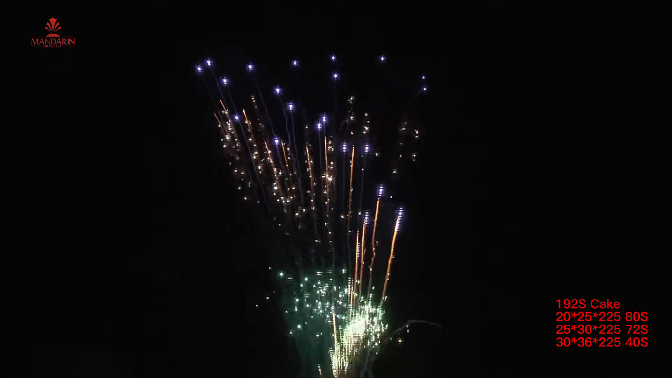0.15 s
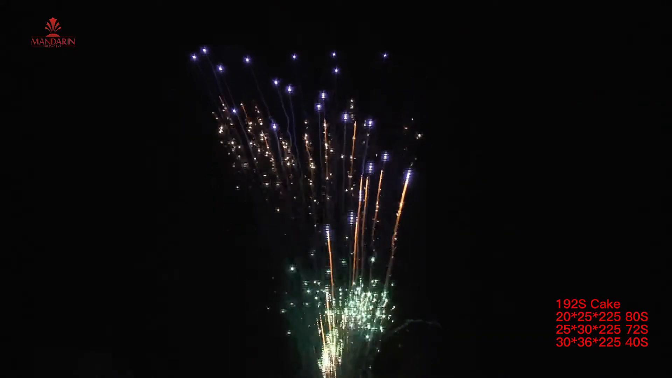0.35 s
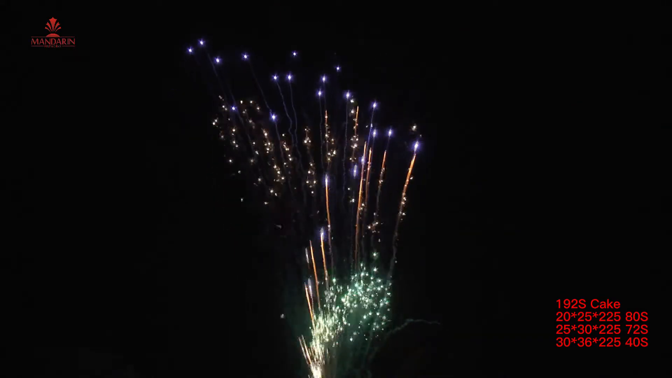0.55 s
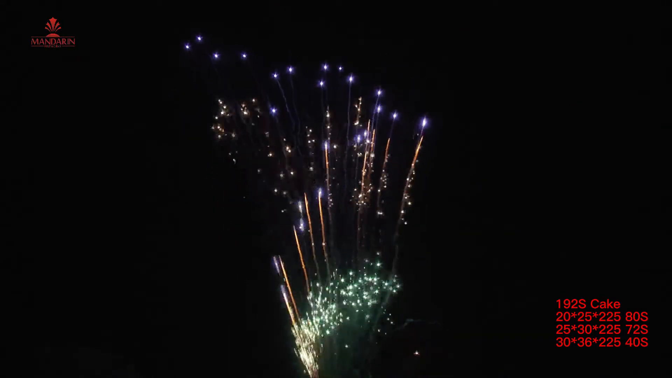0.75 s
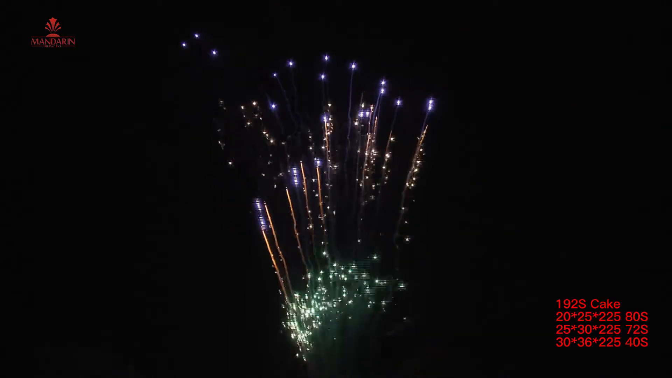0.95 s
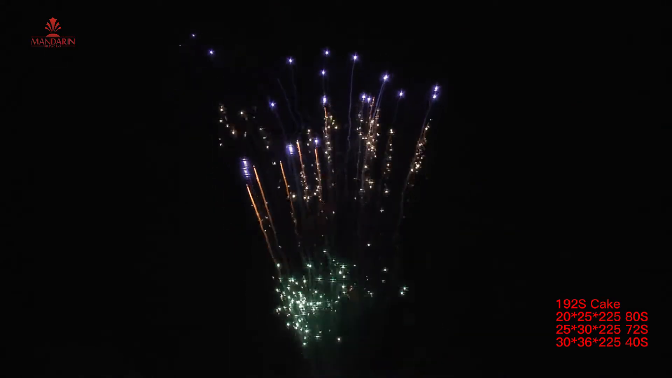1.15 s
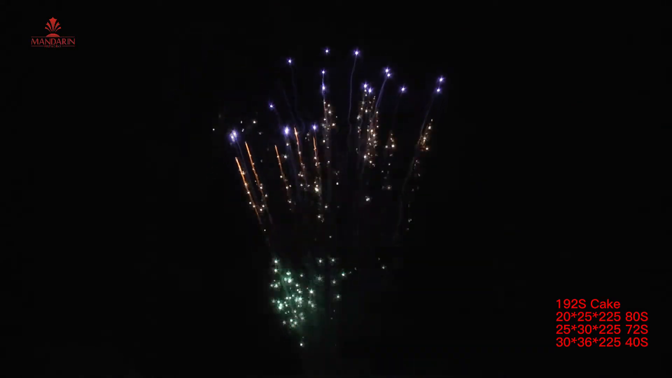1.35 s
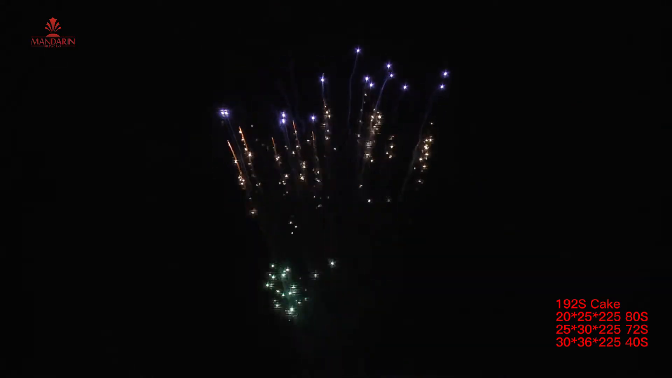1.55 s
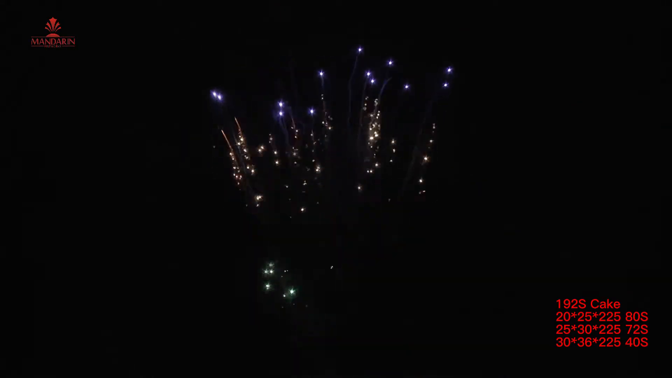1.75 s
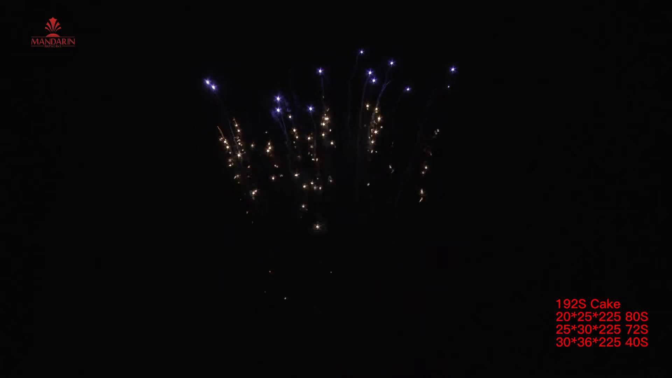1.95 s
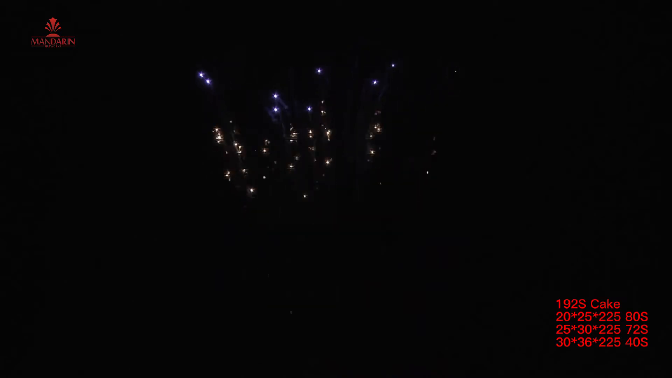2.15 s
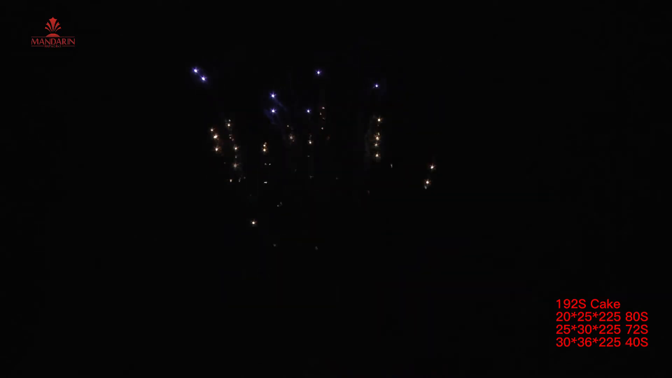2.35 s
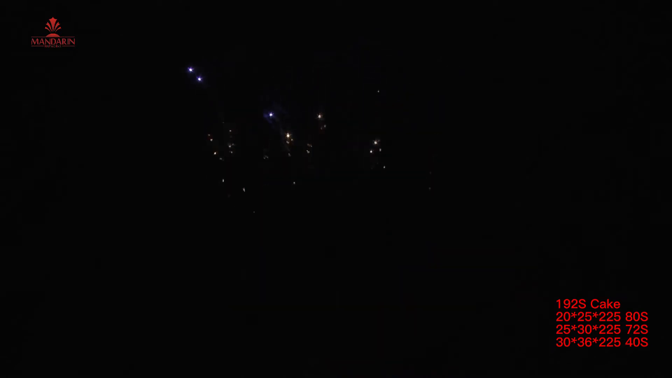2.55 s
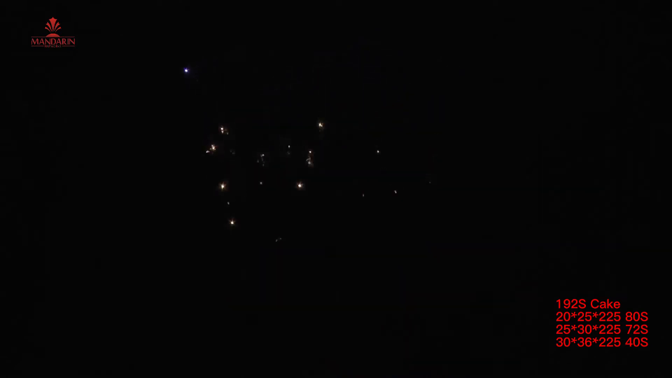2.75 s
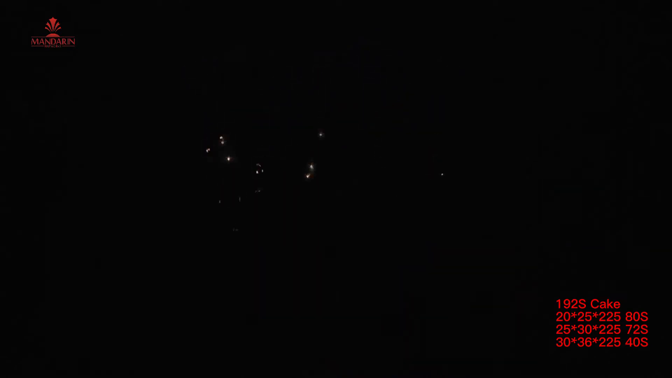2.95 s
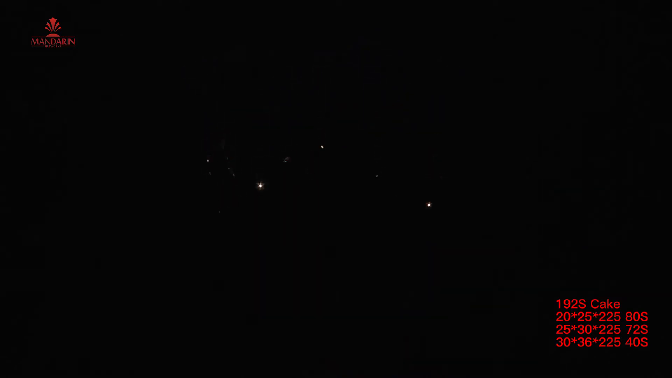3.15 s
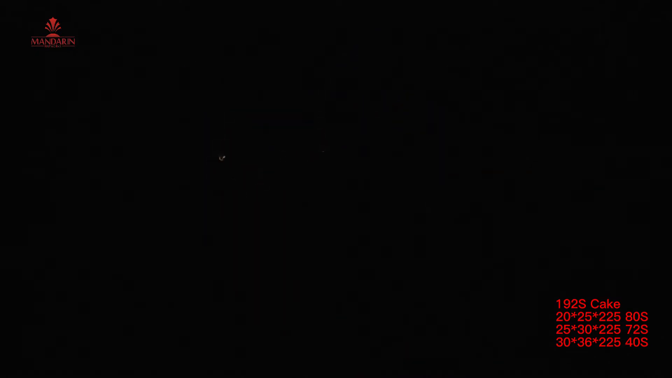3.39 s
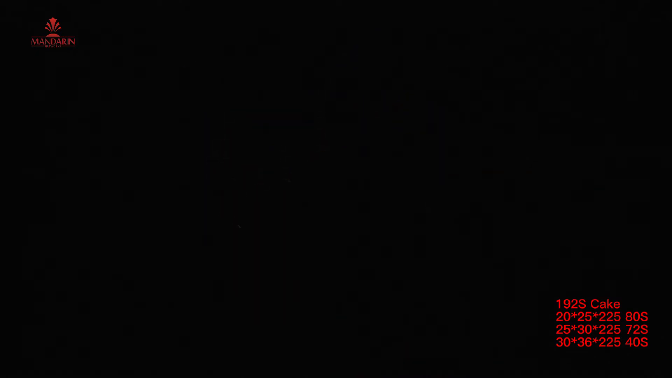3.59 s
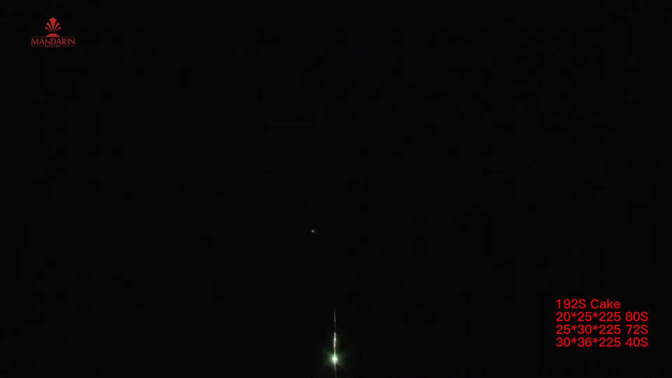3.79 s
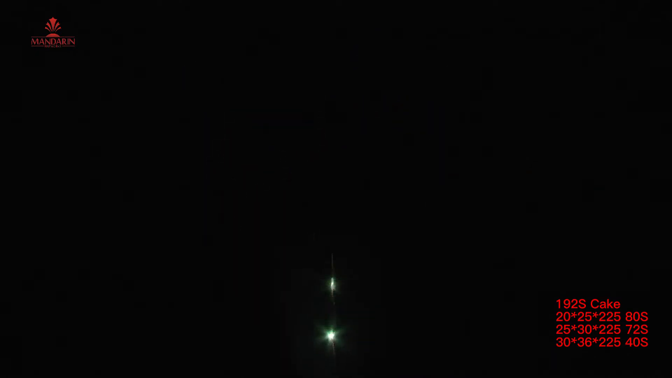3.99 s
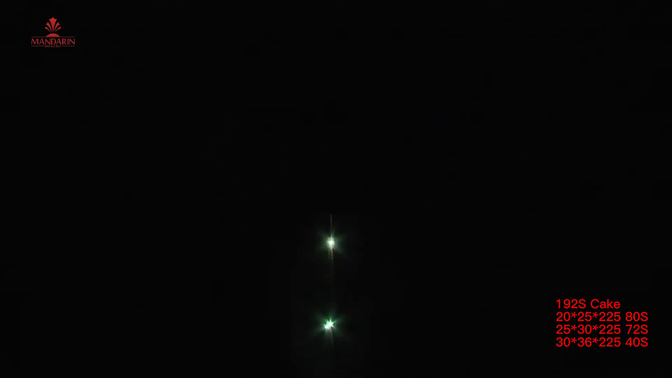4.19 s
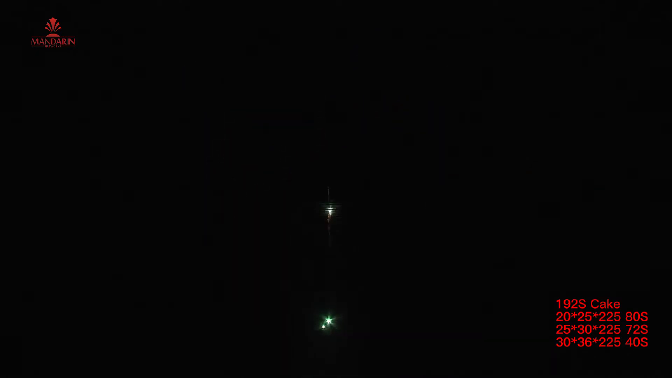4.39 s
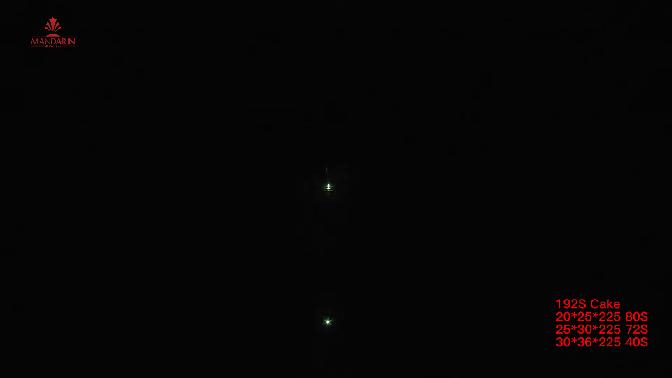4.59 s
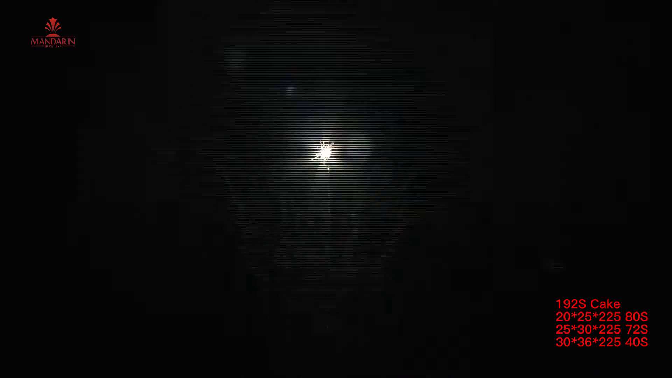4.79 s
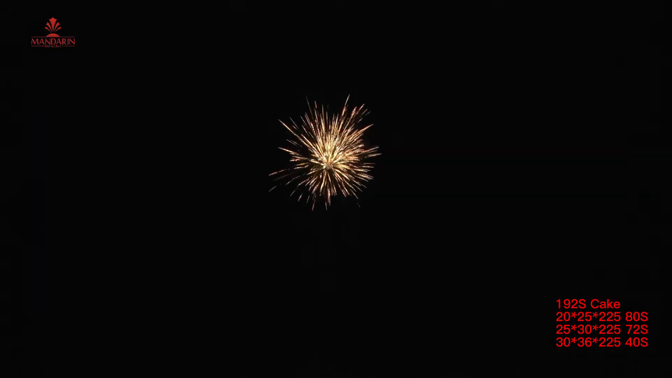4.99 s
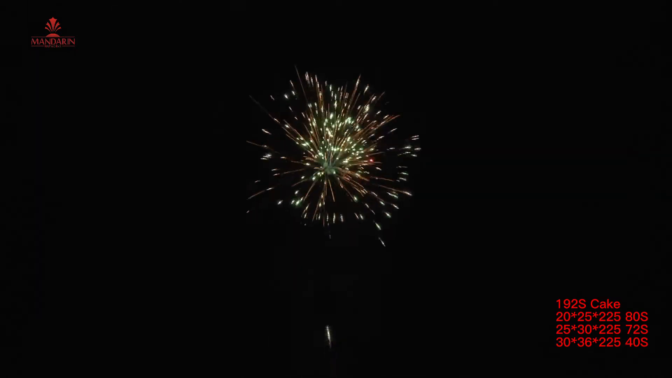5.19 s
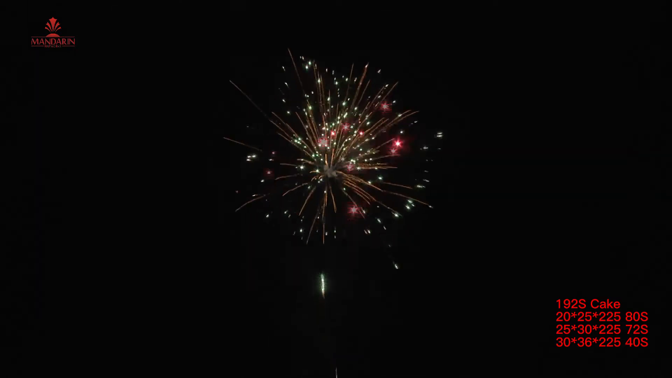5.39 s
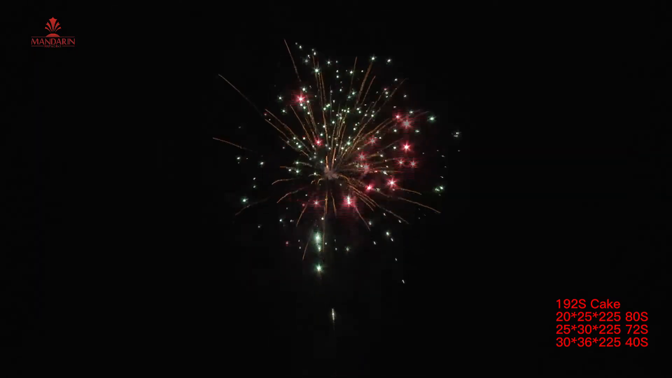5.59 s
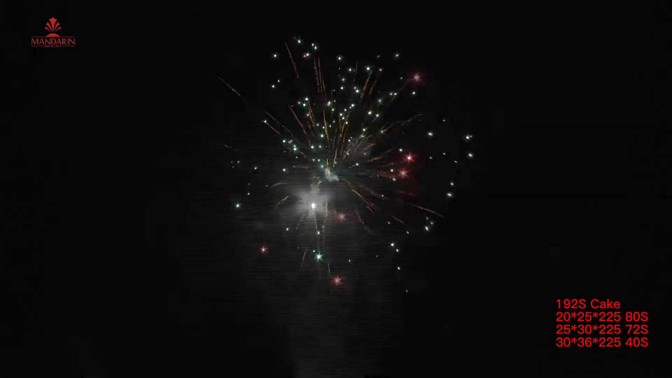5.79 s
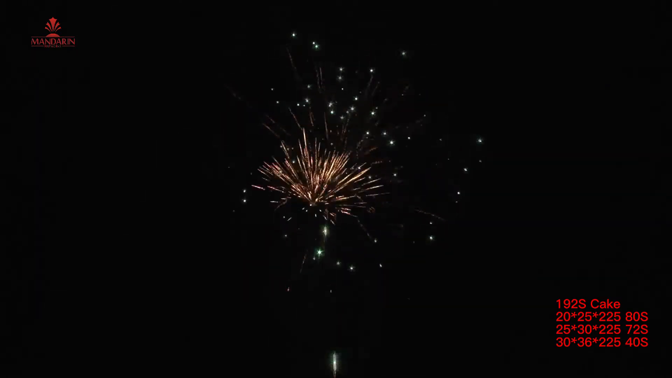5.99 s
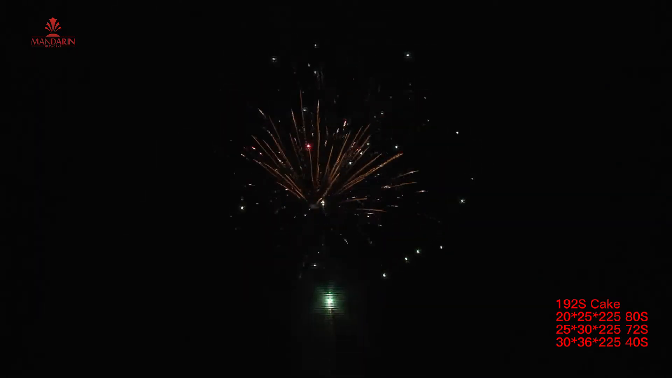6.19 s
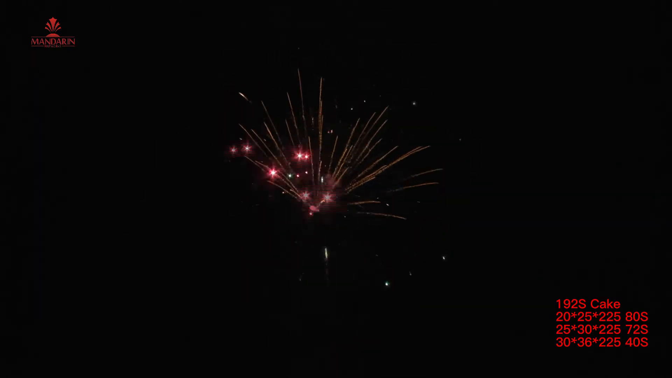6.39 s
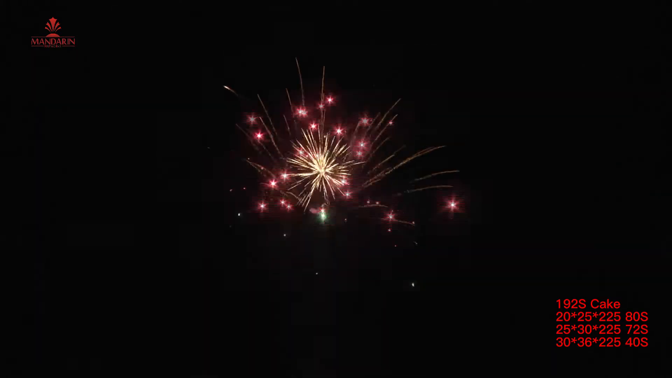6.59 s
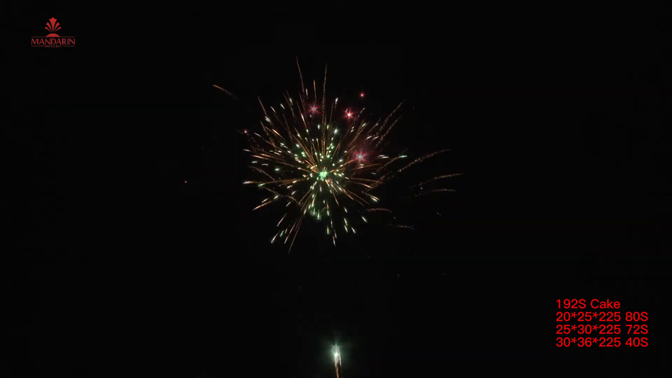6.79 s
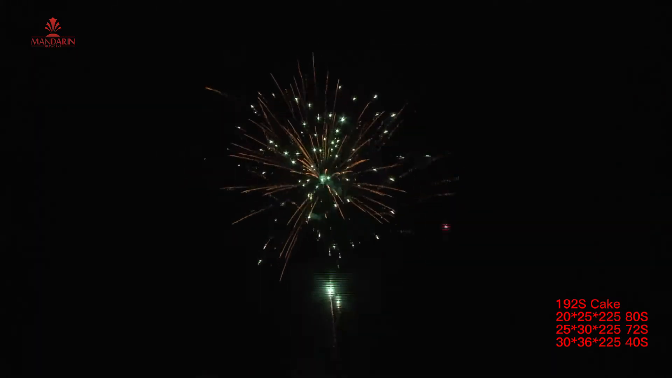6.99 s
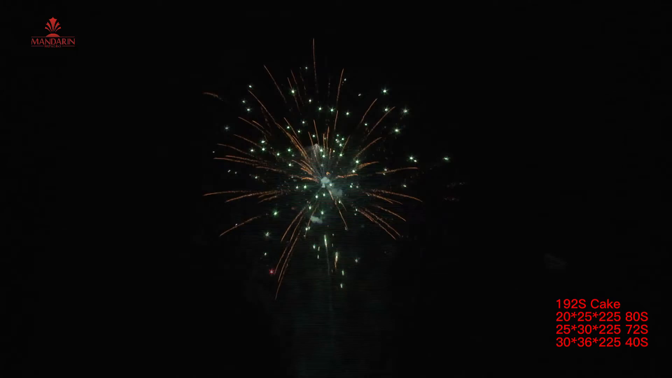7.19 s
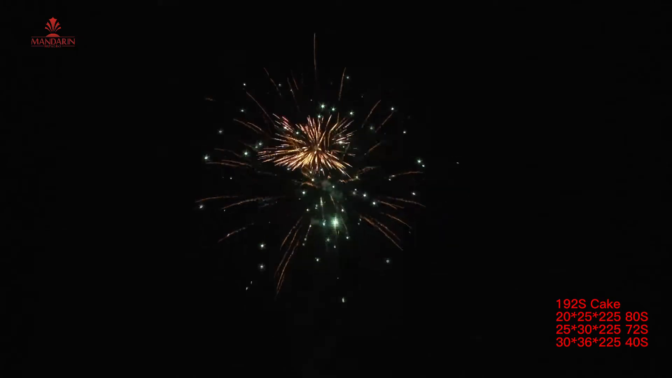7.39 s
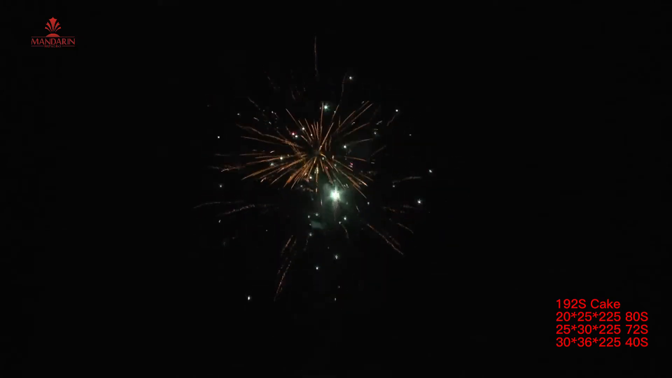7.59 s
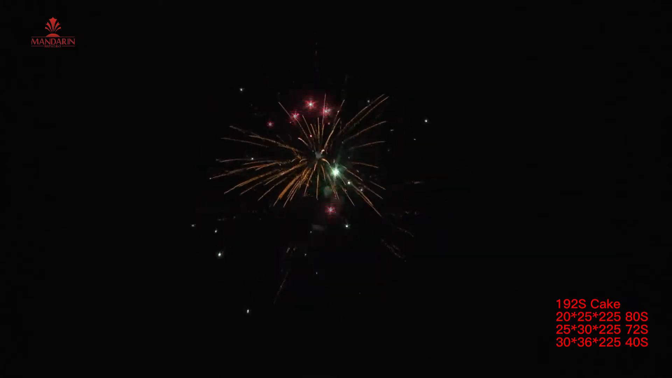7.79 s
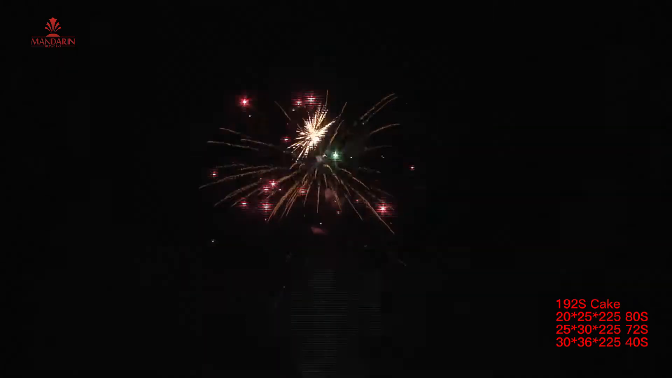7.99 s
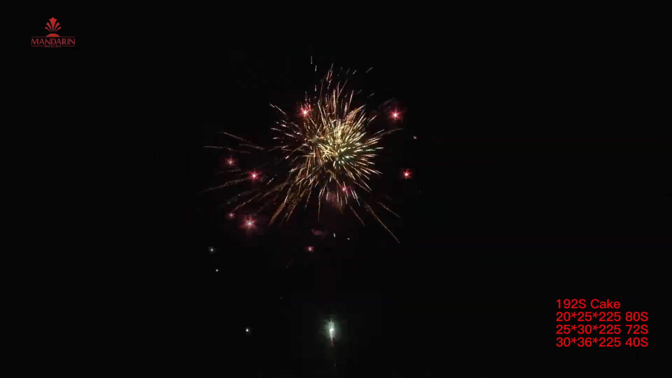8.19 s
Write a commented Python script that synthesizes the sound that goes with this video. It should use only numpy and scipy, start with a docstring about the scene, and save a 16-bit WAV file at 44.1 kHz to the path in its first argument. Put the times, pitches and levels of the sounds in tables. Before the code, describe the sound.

Outdoor fireworks at night: quick overlapping tube thumps, a faintly crackling lull, then booming launches answered by hard, snapping shell bursts overhead.

```python
"""A quick fan of firework lift charges at night, a pause, then single lifts and shells that burst overhead.
Each blast is a ringing pressure step, answered by noise tails from ground, walls and a far slope.
Shaped noise makes the fan's fizzing tails, faint pops, rustles, an insect and the background hum and hiss.
The recorder limits the blasts."""
import sys
import numpy as np
from scipy import signal
from scipy.io import wavfile
from scipy.ndimage import uniform_filter1d

SR = 44100
rng = np.random.default_rng(int(sys.argv[2]) if len(sys.argv) > 2 else 0)


def master(y):
    """Save y as 16-bit WAV."""
    cut = np.clip(np.atleast_2d(y).T, -1, 1)
    pcm = np.round(cut * 32767)  # scale
    wavfile.write(sys.argv[1], SR, pcm.astype(np.int16))


N = 363825  # samples

# lift charges in the tubes: start_s, thump_db, echoes_db
LIFTS = [(-.11, -12, -7.5), (-.015, -7, -4.5), (.072, -29, -7.5), (.1601, -11, -8.5), (0.2454, -23, -8),
         (.349, -21, -6), (0.4394, -19, -6), (0.5929, -16, -5.5), (0.6747, -17, -6), (3.672, -3, 3),
         (4.988, -2.5, 0), (5.8849, -12, -2.5), (6.6596, -22, -2.5), (8.007, -12.5, -2.5)]
# first reflections: delay_s, level_db (re echoes)
LIFT_TAPS = [(.0049, -3.5), (.0069, -16), (0.0131, -13.5), (0.0261, -10.5), (0.0317, -11.5)]
# ground, near walls, further walls, far slope, open land: peak_s, peak_db, swell_s, t60_s, hum_db
LIFT_ECHOES = [(.006, -10.5, 0.0027, 0.063, 5), (.03, -15.5, 0.011, 0.49, 9.5),
               (.09, -20.5, .04, 0.66, 3.5), (.46, -36, .07, 0.96, 9.5), (.7, -54, 0.49, 4, 6.5)]
# spectrum of the lift echoes: freq_hz, density_db (per Hz)
LIFT_COLOUR = [(18, -42), (30, -34), (55, -20), (80, -6), (125, -9), (205, -1.5), (270, -1.5), (340, -2.5),
               (430, -13.5), (490, -5.5), (650, -12.5), (900, -16.5), (2500, -27.5), (6000, -35.5),
               (15000, -48.5)]


def lifts():
    """A thump out of the tube with a deep push, its first reflections and the echoes."""
    out = np.zeros((2, N))
    tails = echoes(LIFT_ECHOES, LIFT_COLOUR, bright_db_per_khz=-1.13, lumpy_db=1.5, count=4)
    thump = blow(hz=315, t60_s=0.042, edge_s=.00007, crack=0.064, crack_s=.00008)
    t = np.arange(SR // 4) / SR
    push = np.sin(2 * np.pi * 58 * t) * gain_of(-60 * t / 0.37)
    u = np.arange(-132, 200) / SR
    knock = np.cos(2 * np.pi * 540 * u) * np.exp(-(u / 0.0027) ** 2)  # a wall smears the thump's front
    for start_s, thump_db, echo_db in LIFTS:
        add(out, start_s - .001, gain_of(thump_db) * thump)
        add(out, start_s, gain_of(echo_db - 22) * push)
        for delay_s, tap_db in LIFT_TAPS:
            add(out, start_s + delay_s - .001, gain_of(echo_db + tap_db) * thump)
            add(out, start_s + delay_s - .0027, gain_of(echo_db + tap_db - 11.5) * knock)
        add(out, start_s, gain_of(echo_db) * blend(tails, same=0.54))
    return out


# shells bursting in the air: start_s, crack_db, echoes_db, bounce_delay_s
BURSTS = [(5.042, 5, -1, 0.0073), (5.1293, 10, -1.5, .007), (6.0556, 5, 0, 0.0066),
          (6.7503, 5, -0.5, 0.0064), (7.4792, 5.5, -1, .0074), (8.1869, 5, 1, 0.0081)]
# ground, near walls, further walls, far slope, open land: peak_s, peak_db, swell_s, t60_s, hum_db
BURST_ECHOES = [(.001, -17.5, 0.0028, 0.064, 17), (.045, -11, 0.018, 0.39, 0),
                (.11, -15.5, 0.057, 1.01, -9), (.42, -23.5, .03, .5, 9.5), (.5, -31, 0.4, 3.6, 3.5)]
# spectrum of the burst echoes: freq_hz, density_db (per Hz)
BURST_COLOUR = [(18, -58), (40, -29), (120, -9), (220, -5), (300, -6), (400, -2.5), (600, -10), (800, -18),
                (1260, -18), (2800, -29), (6000, -33), (15500, -40.5)]
BOUNCE_DB = -4.5  # re crack


def bursts():
    """A sharp crack from above, a softer bounce off the ground, then the echoes swell."""
    out = np.zeros((2, N))
    tails = echoes(BURST_ECHOES, BURST_COLOUR, bright_db_per_khz=1.36, lumpy_db=1.0, count=4)
    crack = blow(hz=369, t60_s=0.0071, edge_s=.00004, crack=0.98, crack_s=.00004, lag_s=.00001, hollow=0.81)
    snap = blow(hz=13100, t60_s=0.002, edge_s=.00003, crack=0, crack_s=1)
    crack = crack + gain_of(-4.5) * snap  # the thin snap on top
    bounce = blow(hz=405, t60_s=0.0084, edge_s=.00008, crack=0.085, crack_s=.00007, hollow=0.64)
    for start_s, crack_db, echo_db, bounce_s in BURSTS:
        add(out, start_s - .001, gain_of(crack_db) * crack)
        add(out, start_s + bounce_s - .001, gain_of(crack_db + BOUNCE_DB) * bounce)
        add(out, start_s, gain_of(echo_db) * blend(tails, same=0.45))
    return out


def blow(hz, t60_s, edge_s, crack, crack_s, lag_s=0., hollow=0.):
    """A pressure step that rings down, with a sharp dip and overshoot at its front; starts 1 ms early."""
    t = np.arange(-44, 800) / SR
    t = t - np.array([[0], [lag_s]])  # the right port hears it lag_s later
    after = np.maximum(t, 0)
    ring = gain_of(-60 * after / t60_s) * np.cos(2 * np.pi * hz * after)
    ring = ring * (1 - hollow * np.exp(-after / 0.0004))  # the low ring takes a moment to build
    front = .5 + .5 * np.tanh(t / edge_s)
    u = t / crack_s
    return ring * front + crack * u * np.exp(.5 - .5 * u ** 2)


# low pitches that the place favours: freq_hz, width_hz (1/e half-width), share
HUM = [(109.4, 9.7, 0.58), (206.7, 14.3, 1.49), (373.3, 23.8, 0.39), (441, 56, 0.52), (651, 69, 0.59)]
AIR_DB = .7  # loss per kHz squared and second of path
ECHO_S = 1.9


def echoes(rows, colour, bright_db_per_khz, lumpy_db, count):
    """Several dense tails of one place; air dulls longer paths, bright_db_per_khz tilts the first moments."""
    t = np.arange(round(ECHO_S * SR)) / SR
    power = np.array([gain_of(swell_db(t, *row[:4])) ** 2 for row in rows])
    hum_db = np.array(rows)[:, -1] @ power / power.sum(0)  # the loudest answer sets the hum

    def field_db(hz, s):
        hum = sum(share * np.exp(-((hz - f) / width) ** 2) for f, width, share in HUM)
        khz = hz / 1000
        tilt_db = khz * bright_db_per_khz * np.exp(-s / 0.022)
        air_db = -AIR_DB * khz ** 2 * s
        return read(colour, hz) + tilt_db + air_db + np.interp(s, t, hum_db) * hum

    shape = np.sqrt(power.sum(0))
    return np.array([evened(hiss(len(t), field_db, lumpy_db)) * shape for _ in range(count)])


def blend(tails, same):
    """Blasts from nearly the same spot share part of their echoes."""
    share = rng.standard_normal(len(tails) - 1)
    share = np.append(same, np.sqrt(1 - same ** 2) * share / np.linalg.norm(share))
    return np.tensordot(share, tails, axes=1)


FAN_END_S = 1  # lifts before this carry fizzing tails
FIZZ_DB, FIZZ_T60_S, EMBER_DB, EMBER_T60_S = -48.5, 0.85, -73, 8.7  # per tail


def comets(hz=5600, octaves=0.78):
    """The burning tails of the fan fizz in the treble: a quick fizz, then faint embers."""
    t = np.arange(N) / SR
    power = np.zeros(N)
    for start_s, *_ in LIFTS:
        if start_s < FAN_END_S:
            for db, t60_s in [(FIZZ_DB, FIZZ_T60_S), (EMBER_DB, EMBER_T60_S)]:
                power += gain_of(swell_db(t, start_s, db, .02, t60_s)) ** 2
    fizz = hiss(N, lambda f, s: band_db(f, hz, octaves), lumpy_db=3.0)
    return np.sqrt(power) * evened(fizz)


# faint pops, a far thud and rustles: start_s, level_db, t60_s, centre_hz, half_width_octaves (to -12 dB)
FAINT = [(1.33, -58, 0.19, 8070, 1.84), (1.932, -37, 0.37, 333, 0.76), (1.942, -51.5, 0.46, 6960, 7.1),
         (2.476, -50, 0.17, 3500, 1.3), (2.7, -56, .15, 4000, 1.8), (2.995, -52, 1, 2800, 4.7),
         (3.143, -45, 0.64, 3240, 3.2), (3.265, -49, 0.33, 900, 2.4), (3.28, -60, .52, 2780, .47),
         (7.386, -48.5, 0.24, 6760, .82)]
FAINT_RISE_S = 0.0074
# brief uneven patches of low-band background noise: start_s, level_db, centre_hz
LOW_PATCHES = [(2.551, -51.5, 290), (2.602, -47, 95), (3.251, -46, 64.3), (4.701, -46, 145)]
PATCH_RISE_S, PATCH_T60_S, PATCH_OCTAVES = 0.041, 0.78, 0.36


def faint():
    """Noise puffs: pops and rustles start quickly; low-band background patches rise more slowly."""
    out = np.zeros((2, N))
    for start_s, db, t60_s, hz, octaves in FAINT:
        add(out, start_s, puff(db, FAINT_RISE_S, t60_s, hz, octaves))
    for start_s, db, hz in LOW_PATCHES:
        add(out, start_s, puff(db, PATCH_RISE_S, PATCH_T60_S, hz, PATCH_OCTAVES))
    return out


def puff(db, rise_s, t60_s, centre_hz, octaves):
    """A short puff of noise in one band, with a linear rise and an even decay in dB."""
    t = np.arange(SR) / SR
    band = hiss(len(t), lambda hz, s: band_db(hz, centre_hz, octaves))
    return evened(band) * gain_of(db - 60 * t / t60_s) * np.minimum(t / rise_s, 1)


# buzzes: peak_s, level_db
INSECT = [(3.671, -57), (7.402, -67)]
INSECT_SWELL_S, INSECT_FADE_T60_S = 0.18, 0.021


def insect(hz=12500, width_hz=500):
    """A thin high buzz of narrow-band noise, heard twice, swelling to a peak and fading fast."""
    t = np.arange(N) / SR
    level = sum(gain_of(swell_db(t, peak_s, db, INSECT_SWELL_S, INSECT_FADE_T60_S)) for peak_s, db in INSECT)
    buzz = hiss(N, lambda f, s: np.maximum(-8 * abs((f - hz) / width_hz) ** 1.3, -60))
    return level * evened(buzz)


# level curve of the night: time_s, level_db
NIGHT = [(0, -45), (2.3, -53), (4.8, -55.5), (8.25, -62)]
# spectrum of the night: freq_hz, density_db (per Hz)
NIGHT_COLOUR = [(15, -45), (30, -23), (60, -1), (80, -8.5), (105, -8), (150, -6), (210, -10), (300, -11.5),
                (500, -15.5), (1070, -20), (2550, -28), (6000, -34.5), (9000, -32.5), (11000, -46),
                (16000, -50)]


def night():
    """The background hum and hiss of the night: shaped noise on a typed level curve."""
    level = gain_of(np.interp(np.arange(N) / SR, *np.transpose(NIGHT)))
    return level * evened(hiss(N, lambda hz, s: read(NIGHT_COLOUR, hz), lumpy_db=1.0, patchy_db=2.1))


# stereo width: freq_hz, side_minus_mid_db
WIDTH = [(60, -29.5), (110, -50), (200, -37.5), (380, -22.5), (700, -16.5), (1290, -10), (2380, -11),
         (4400, 1.5), (8120, -14.5), (15000, -8)]


def hiss(size, field_db, lumpy_db=0., patchy_db=2.5):
    """Two-channel noise shaped by field_db(Hz, s), its width set per pitch; lumps make it grainy."""
    mid_side = rng.standard_normal((2, size))
    lumps = evened(uniform_filter1d(rng.standard_normal(size), 150))
    mid_side *= gain_of(lumpy_db * lumps)
    hz, t, z = signal.stft(mid_side, SR, nperseg=2048, noverlap=1536)
    z *= gain_of(field_db(hz[:, None], t))
    patches = uniform_filter1d(rng.standard_normal(z.shape[1:]), 8, axis=0)
    patches = uniform_filter1d(patches, 3, axis=1)
    z *= gain_of(patchy_db * evened(patches))  # random level patches over time and pitch
    z[1] *= gain_of(read(WIDTH, hz))[:, None]
    mid, side = signal.istft(z, SR, nperseg=2048, noverlap=1536)[1][:, :size]
    return np.array([mid + side, mid - side])


def band_db(hz, centre_hz, octaves):
    """Bell-shaped band on a log-frequency axis, -12 dB at octaves from the centre."""
    return -12 * (np.log2((hz + 1) / centre_hz) / octaves) ** 2


def swell_db(t, peak_s, db, swell_s, t60_s):
    """Level that swells like a bell to its peak, then dies away evenly."""
    before, after = np.minimum(t - peak_s, 0), np.maximum(t - peak_s, 0)
    return db - 6 * (before / swell_s) ** 2 - 60 * after / t60_s


def gain_of(db):
    """Decibels to gain."""
    return 10 ** (np.asarray(db) / 20)


def evened(x):
    """Scales to rms 1."""
    return x / np.sqrt(np.mean(x ** 2) + 1e-20)


def read(points, hz):
    """Reads a spectrum on a log-frequency axis."""
    f, value = np.transpose(points)
    return np.interp(np.log(hz + 1), np.log(f + 1), value)


def add(mix, start_s, sound):
    """Mixes a sound in at start_s, cut at both ends of the mix."""
    at = round(start_s * SR)
    part = mix[:, max(at, 0):max(at + sound.shape[-1], 0)]
    part += sound[..., max(-at, 0):][..., :part.shape[1]]


def scene():
    """All sources together."""
    return lifts() + bursts() + comets() + faint() + insect() + night()


# colour of the microphone in its housing: freq_hz, gain_db
MICROPHONE = [(1000, 0.5), (1600, -2), (2200, 3), (3100, 4.5), (3700, -4.5), (4600, -5), (6000, 0),
              (7500, -6), (9000, -4.5), (10300, -9.5), (13000, -8), (15000, -18), (15600, -27)]
CEILING, EDGE_HZ = .97, 16500  # soft-clip level, band limit


def record(dry):
    """Microphone colour; a limiter ducks everything just after each blast; soft clipping; band limit."""
    log_gain = np.log(gain_of(read(MICROPHONE, abs(np.fft.fftfreq(2048, 1 / SR)))))
    response = np.fft.ifft(np.exp(np.conj(signal.hilbert(log_gain)))).real[:1024]  # causal phase
    heard = signal.oaconvolve(dry, response[None])[:, :N]
    own_hiss = evened(hiss(N, lambda hz, s: -40. * (hz > 15400)))
    heard = heard + gain_of(-72.5) * own_hiss
    power = uniform_filter1d((heard ** 2).mean(0), 90, origin=40)
    power_db = 10 * np.log10(abs(power) + 1e-12)
    fall_db = np.arange(N) * 117.0 / SR  # the held peak falls 117 dB/s
    held_db = np.maximum.accumulate(power_db + fall_db) - fall_db
    over_db = np.maximum(held_db + 10.5, 0)
    ducked = heard / gain_of(.5 * uniform_filter1d(over_db, 60))  # half the excess
    clipped = np.tanh(ducked / CEILING) * CEILING
    lowpass = signal.firwin(255, EDGE_HZ, window=("kaiser", 9), fs=SR)
    return signal.oaconvolve(clipped, lowpass[None], "same")


dry = scene()
out = record(dry)
master(out)
```